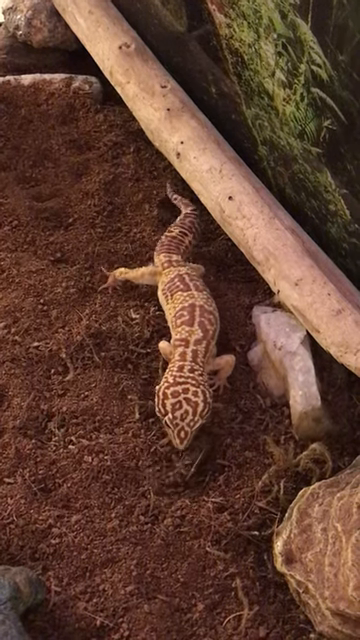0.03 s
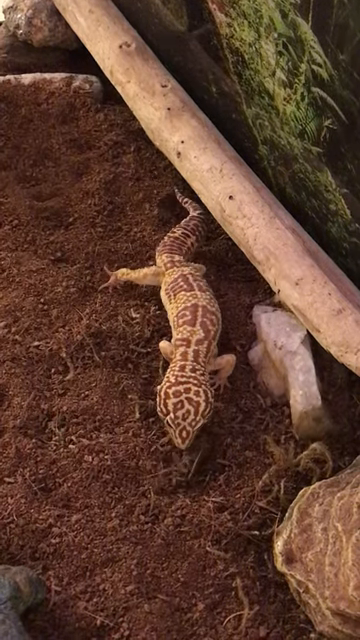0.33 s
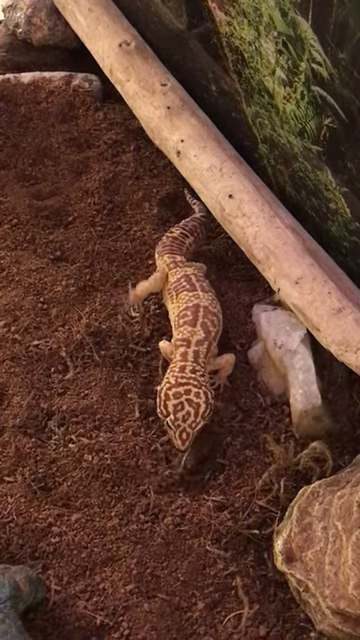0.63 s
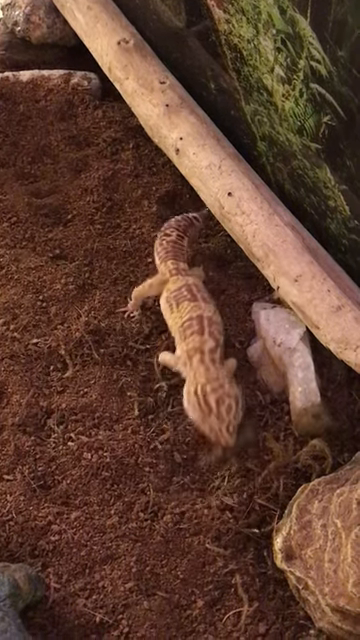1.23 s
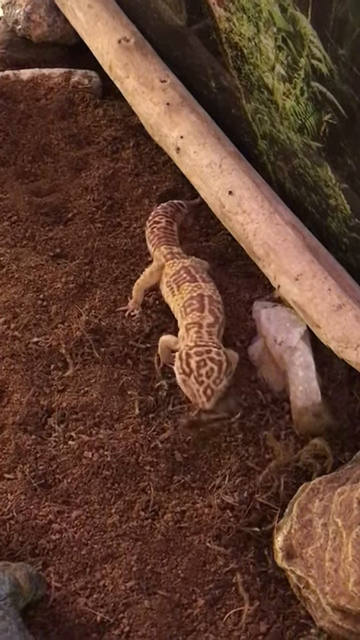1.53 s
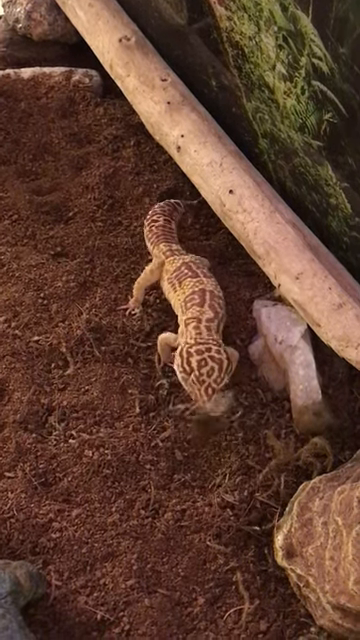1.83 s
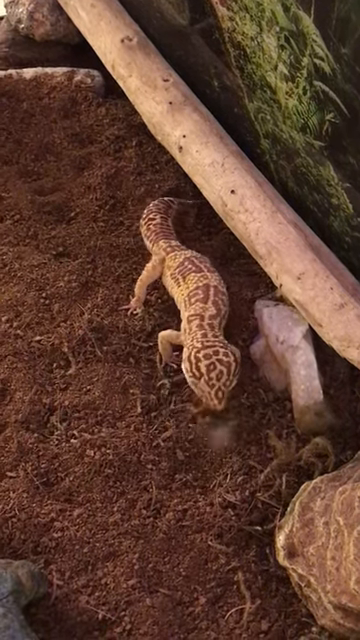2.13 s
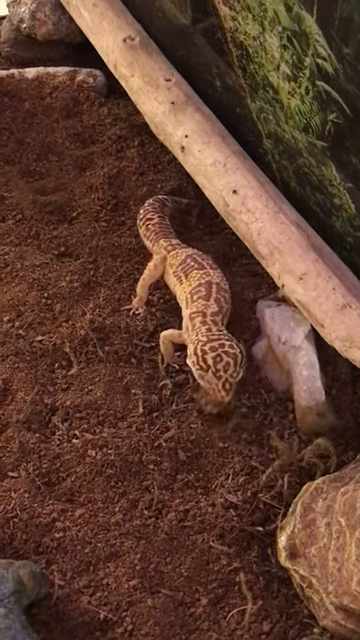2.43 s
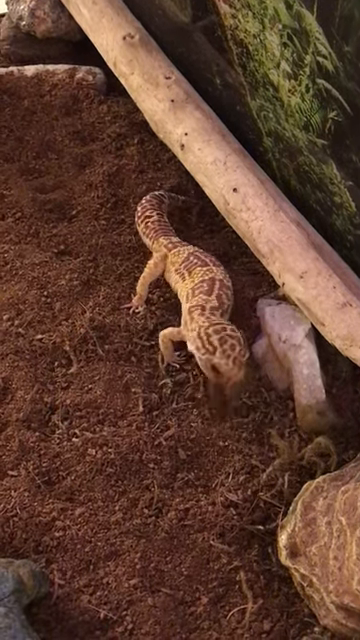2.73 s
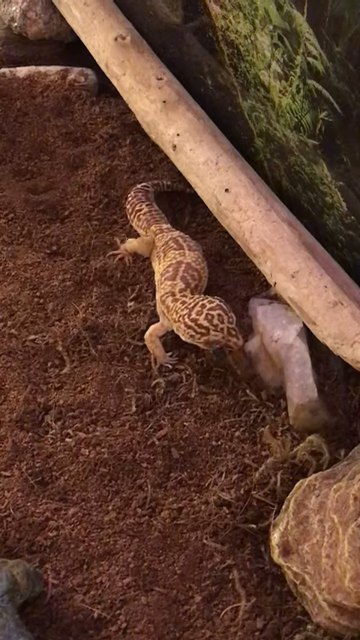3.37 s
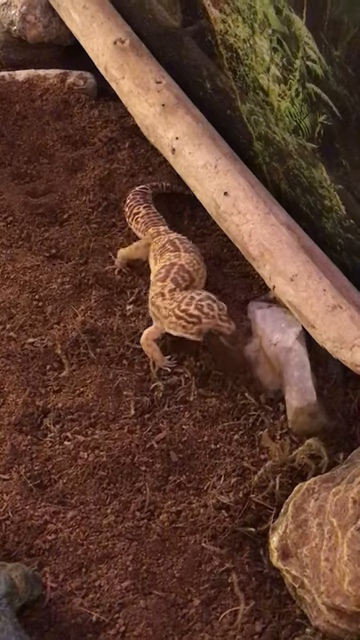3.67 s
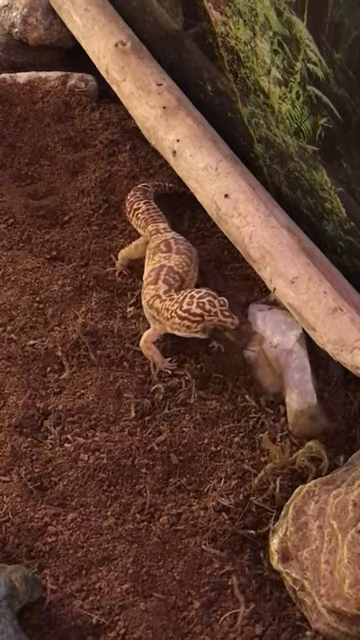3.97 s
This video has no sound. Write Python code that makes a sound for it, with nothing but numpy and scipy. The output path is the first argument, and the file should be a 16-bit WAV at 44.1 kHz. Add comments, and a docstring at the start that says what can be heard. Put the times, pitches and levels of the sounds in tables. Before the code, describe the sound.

A gecko bites an insect with a small, sharp crack at about 0.9 seconds and a thinner snap at 1.2. Dry wings scrape in fits from 1.8 seconds, flutter evenly from 2.2 to 2.7 with a faint thin squeak, then falter by 3. Tiny shell ticks and soft soil rustles are scattered throughout, clustering near 3.6 seconds, over a steady low electrical room hum.

```python
"""A glass tank in a quiet, humming room: a gecko snaps up a large winged insect on loose soil.
The bite cracks the shell once, and a thinner snap follows with the lunge. The insect thrashes,
beats its dry wings about twenty times a second under a thin squeak, then falters.
Feet and bodies rustle in the soil, dotted with small ticks of shell and grit.
Behind it all sits a bed of mains hum, fan whine and soft air."""
import sys
import numpy as np
from scipy import signal
from scipy.fft import rfft, irfft
from scipy.io import wavfile
from scipy.ndimage import uniform_filter1d, map_coordinates

SR = 44100
rng = np.random.default_rng(int(sys.argv[2]) if len(sys.argv) > 2 else 0)


def int16_out(signal):
    """Quantize to a 16-bit WAV file."""
    q = np.round(np.clip(np.atleast_2d(signal).T, -1, 1) * 32767)
    wavfile.write(sys.argv[1], SR, q.astype(np.int16))


N = 176400
T = np.arange(N) / SR

# ring of the cracking shell (frequency [Hz], relative level [dB], t60 [s])
SHELL_MODES = [(2200, -15, 0.0097), (2480, -10, 0.019), (2680, -4, 0.0087), (3150, -6.5, 0.0067),
               (3900, -7.5, 0.0036), (5260, -16, .003), (6100, -14.5, .004), (6500, -17, .004)]
# ring of the piece that breaks in the lunge (frequency [Hz], relative level [dB], t60 [s])
SNAP_MODES = [(2600, -30, 0.0025), (3370, -9, 0.0071), (5840, -5, 0.002), (6460, 0, 0.0027),
              (8350, 0, 0.0029), (11600, -9, .0012), (14300, -3, .0015)]
# ticks of shell and grit (time [s], dry peak level [dB], centre [Hz])
TICK_CUES = [(.091, -55, 11000), (.501, -50, 8900), (0.941, -49, 910), (0.985, -41, 12100),
             (1.046, -52, 11000), (1.059, -50, 10000), (1.166, -48, 6470), (1.2047, -53, 11300),
             (1.549, -45, 11000), (1.587, -43, 11000), (1.625, -52, 12000), (2.1115, -48, 10500),
             (2.1605, -40, 9500), (2.1795, -42.5, 6000), (2.287, -45, 12500), (2.524, -55, 9500),
             (2.7095, -45, 13500), (2.78, -43, 8950), (2.892, -48, 11000), (2.9235, -42.5, 8500),
             (3.228, -49, 1520), (3.330, -54, 12000), (3.3395, -51.5, 4960), (3.3395, -61, 12000),
             (3.380, -55, 12000), (3.390, -53, 9000), (3.481, -52, 11000), (3.613, -47, 10000),
             (3.6255, -45, 11000), (3.644, -47, 11000), (3.654, -48, 5000), (3.663, -43, 13500),
             (3.6878, -42, 13000), (3.6895, -44, 13000), (3.6912, -42, 12500), (3.817, -39.5, 13500)]

# single wing strokes of the struggle (time [s], level [dB], swell [s])
WING_STROKES = [(1.8045, -53.5, 0.0053), (1.819, -60, 0.0036), (1.851, -59.5, .006), (1.874, -60, .002),
                (1.926, -56.5, 0.0044), (1.963, -54, 0.0051), (1.971, -49, 0.0038), (1.980, -60, 0.0071),
                (2.023, -67, 0.0053), (2.053, -57, 0.0048), (2.073, -62, 0.0037), (2.109, -52.5, 0.0033),
                (2.127, -59, .006), (2.158, -62, 0.006), (2.176, -63, 0.0058), (2.217, -61, .004),
                (2.255, -62, .003), (2.305, -66, .003), (2.356, -63, .003), (2.726, -66, 0.005),
                (2.736, -63, 0.006), (2.773, -59, 0.002), (2.778, -56, .003), (2.786, -57, 0.0065),
                (2.828, -58.5, 0.0038), (2.843, -58, 0.0019), (2.875, -59, 0.0038), (2.890, -55, 0.0027),
                (2.923, -59.5, 0.0051), (2.935, -60, 0.0042), (2.968, -57.5, 0.0038), (2.983, -57, 0.0061),
                (3.026, -64, 0.0042), (3.043, -62, 0.0045), (3.064, -61, .003)]
# force of the flutter's downstrokes (time [s], level [dB])
FLUTTER_EFFORT = [(2.24, -55.5), (2.3, -56), (2.44, -57.5), (2.49, -56), (2.59, -57.5), (2.69, -56.5)]
# wings brushing the soil between strokes (time [s], level [dB])
WING_BRUSHING = [(1.98, -82), (2.1, -68.5), (2.35, -81), (2.75, -79), (3.1, -81)]
# dry wing tone, with narrow peaks near 9 and 12 kHz (frequency [Hz], relative level [dB])
WING_EQ = [(1000, -12.5), (3700, -8.5), (4900, -11.5), (6300, -7.5), (7100, -6), (7800, -10), (8600, 4),
           (8950, -6), (9300, 4.5), (9850, -4.5), (10500, -7), (11500, -2), (12000, -5), (12300, 2),
           (12700, -4), (14000, -6), (16000, -6)]
# swell of air stirred by the wings (time [s], level [dB])
DRAUGHT_FADE = [(1.8, -85), (2.3, -70), (2.7, -66), (3.0, -73), (3.4, -82), (3.9, -93)]
# tone of that stirred air (frequency [Hz], relative level [dB])
DRAUGHT_EQ = [(150, 9), (350, -12), (550, 7.5), (850, -8), (1200, 6), (1700, -16), (4000, -14.5),
              (6000, -25)]
# thin squeak during the flutter (time [s], pitch [Hz], level [dB])
SQUEAK_CONTOUR = [(2.38, 2453, -84), (2.45, 2480, -74), (2.49, 2390, -82), (2.514, 2490, -69),
                  (2.54, 2490, -74), (2.565, 2525, -67), (2.605, 2500, -82), (2.63, 2480, -76),
                  (2.682, 2525, -67), (2.71, 2420, -79), (2.78, 2280, -82)]

# shuffles in the soil (time [s], length [s], start level [dB], end level [dB])
SOIL_SHUFFLES = [(0.078, 0.63, -75.5, -82.5), (0.612, 0.43, -79.5, -67.5), (1.042, 0.022, -66, -58),
                 (1.063, 0.12, -61, -72.5), (1.18, 0.19, -73, -79), (1.547, 0.057, -69, -66),
                 (1.616, .11, -75, -69.5), (1.785, 0.27, -80, -71), (2.054, 1.0, -69, -71),
                 (3.053, 0.113, -75, -76), (3.22, 0.055, -75, -76), (3.28, 0.03, -69, -67),
                 (3.578, 0.02, -74, -61.5), (3.599, 0.079, -66, -73.5)]
# tone of loose soil (frequency [Hz], relative level [dB])
SOIL_EQ = [(1000, 5), (3500, -7), (5000, -4.5), (6200, 0), (7400, -2.5), (8700, 3), (10400, -3),
           (11600, 3.5), (14500, 0), (16000, -12)]
# soft pats on the soil (time [s], level [dB], centre [Hz])
SOIL_PATS = [(2.345, -72, 402), (3.217, -59, 292), (3.342, -61, 262), (3.785, -71, 650)]
# claws and legs scratching the soil, duller than the wings (time [s], level [dB], swell [s])
CLAW_SCRATCHES = [(1.164, -67, 0.0044), (1.9725, -56.5, 0.0038), (2.054, -64, .005), (2.177, -58, 0.0056),
                  (2.729, -66, 0.011), (2.776, -68, 0.011), (3.592, -72, 0.014)]

# mains hum and a small motor (frequency [Hz], level [dB])
HUM_TONES = [(120, -46), (107.4, -63.5), (113.8, -74), (132.4, -75), (138.6, -71), (141.7, -74),
             (144.8, -70), (240, -80), (752, -84), (1054, -86), (1397, -85)]
# fan whine: its fundamental, then its partials (harmonic [number], level [dB])
FAN_HZ, FAN_PARTIALS = 214.8, [(1, -70), (2, -81.5), (3, -78.5)]
# tone of the room air (frequency [Hz], relative level [dB])
AIR_EQ = [(22, -29), (31, -4), (70, 3), (130, 4.5), (190, -4), (300, -4), (500, -9), (640, -6), (850, -9.5),
          (1250, -8.5), (1600, -13), (2500, -14), (3000, -18), (4200, -19), (4900, -25), (5600, -22.5),
          (7600, -28), (9200, -26.5), (10400, -30.5), (11600, -26.5), (16000, -28.5)]


def bite(bite_s=.942, snap_s=1.2198):
    """The jaws crack the shell, which rings for milliseconds; a thinner snap comes with the lunge."""
    bandpass = signal.butter(5, (1800, 7000), "band", fs=SR, output="sos")
    crack = signal.sosfilt(bandpass, ring(bite_s, SHELL_MODES))
    return amp(-33) * crack + amp(-44) * ring(snap_s, SNAP_MODES)


def ticks(decay_s=.00025):
    """Sharp little fractures, each with its own brightness: one clean break and a brief rattle."""
    out, size = np.zeros(N), 1024
    age = (np.arange(size) - size // 2) / SR
    click = age == 0
    for time, db, hz in TICK_CUES:
        rattle = rng.standard_normal(size) * (age > 0) * np.exp(-abs(age) / decay_s)
        burst = band(click + .4 * rattle, hz, octaves=.72)
        first = int(time * SR) - size // 2
        out[first:first + size] += amp(db) * burst / abs(burst).max()
    return out


def wings(flutter_s=2.2368, beat_s=.0507, beats=10, swell_s=.0032):
    """Dry wings scrape in fits, break into an even flutter that stirs the air, then falter."""
    power = sum(stroke(*cue) ** 2 for cue in WING_STROKES)
    for start in flutter_s + beat_s * np.arange(beats):
        db = np.interp(start, *np.array(FLUTTER_EFFORT).T)
        downstroke = stroke(start, db, swell_s)
        weak_return = stroke(start + .65 * beat_s, db - 5, swell_s)
        power += downstroke ** 2 + weak_return ** 2
    envelope = np.sqrt(power + fade(WING_BRUSHING) ** 2)
    texture = colour(crackle(rough_db=3.5, grain_hz=5000), WING_EQ)
    scrape = envelope * shimmer(flex(texture))
    draught = fade(DRAUGHT_FADE) * colour(rng.standard_normal(N), DRAUGHT_EQ)
    return scrape + draught


def flex(x, bend=.025, rate_hz=60):
    """Flexing wings bend all their resonances up and down a little."""
    playhead = np.arange(N) + np.cumsum(bend * walk(rate_hz))
    return map_coordinates(x, [playhead], order=5, mode="mirror")


def squeak(jitter=.022, rough_db=2):
    """A rough, thin tone that rises as it swells and sags as it fades."""
    times, hz, db = np.array(SQUEAK_CONTOUR).T
    pitch = np.interp(T, times, hz) * (1 + jitter * walk(600))
    tone = np.sin(2 * np.pi * np.cumsum(pitch) / SR) * amp(rough_db * walk(200))
    return fade(list(zip(times, db))) * unit(tone)


def soil(rough_db=4.5, edge_s=.0034, resting_per_s=20, stirred_per_s=110):
    """Crumbs shift as the two animals shuffle, pat and scratch; lone grains settle throughout."""
    effort = sum(fade([(start, start_db), (start + length, end_db)])
                 for start, length, start_db, end_db in SOIL_SHUFFLES)
    crumbs = shimmer(colour(crackle(rough_db, grain_hz=3000), SOIL_EQ))
    rustle = uniform_filter1d(effort, int(edge_s * SR)) * crumbs
    grains_per_s = resting_per_s + stirred_per_s * effort / effort.max()
    grains = (rng.random(N) < grains_per_s / SR) * rng.random(N) * amp(-45)
    grit = band(grains, hz=15000, octaves=.7)
    pats = sum(stroke(start, db, swell_s=.0083) * unit(band(rng.standard_normal(N), hz, octaves=.33))
               for start, db, hz in SOIL_PATS)
    claw_texture = unit(band(crackle(rough_db, grain_hz=3700), hz=6570, octaves=.32))
    scratches = sum(stroke(*cue) for cue in CLAW_SCRATCHES) * claw_texture
    return rustle + pats + scratches + tank(grit)


def tank(x, delay_s=.00177, decay_s=.0022, wet_db=-6.5):
    """The glass walls add a tight scatter of echoes to the dry sound."""
    age = T[:1024] - delay_s
    echoes = rng.standard_normal(len(age)) * (age > 0) * np.exp(-abs(age) / decay_s)
    return x + amp(wet_db) * signal.fftconvolve(x, echoes / np.linalg.norm(echoes))[:N]


def room(fan_waver=.00293, fan_flicker_db=2, air_db=-62):
    """The background bed: mains and motor hum, a wavering fan and softly drifting air."""
    hum = sum(amp(db) * np.sin(2 * np.pi * (hz * T + rng.random())) for hz, db in HUM_TONES)
    fan_cycles = np.cumsum(FAN_HZ * (1 + fan_waver * walk(12))) / SR
    fan = sum(amp(db + fan_flicker_db * walk(9)) * np.sin(2 * np.pi * harmonic * fan_cycles)
              for harmonic, db in FAN_PARTIALS)
    air = amp(air_db + .5 * walk(6.8)) * colour(rng.standard_normal(N), AIR_EQ)
    return np.sqrt(2) * (hum + fan) + air  # sqrt(2) makes the tone levels rms


def ring(start, modes):
    """Modes struck together and dying away."""
    age = np.maximum(T - start, 0)
    return sum(amp(db - 60 * np.minimum(age / t60, 3)) * np.sin(2 * np.pi * hz * age)
               for hz, db, t60 in modes)


def stroke(start, db, swell_s):
    """Envelope of one brief contact: a rounded swell and a slightly slower fade."""
    progress = np.clip((T - start) / swell_s, 0, 50)
    return amp(db) * (progress * np.exp(1 - progress)) ** 2


def crackle(rough_db, grain_hz):
    """Dense tiny contacts of uneven strength."""
    return rng.standard_normal(N) * amp(rough_db * walk(grain_hz))


def shimmer(x, depth_db=1.5, rate_hz=70):
    """A scrape changes colour from contact to contact: six bands rise and fall independently."""
    log_hz = np.log(np.maximum(np.fft.rfftfreq(N, 1 / SR), 1))
    centres = np.log(np.geomspace(4500, 15000, num=6))
    spectrum = rfft(x)
    bands = [irfft(spectrum * np.interp(log_hz, centres, solo), N) for solo in np.eye(len(centres))]
    return unit(sum(part * amp(depth_db * walk(rate_hz)) for part in bands))


def colour(x, points):
    """EQ through (frequency [Hz], relative level [dB]) points, scaled to rms 1."""
    hz, db = np.array(points).T
    freqs = np.maximum(np.fft.rfftfreq(N, 1 / SR), 1)
    gain = amp(np.interp(np.log(freqs), np.log(hz), db))
    return unit(irfft(rfft(x) * gain, N))


def band(x, hz, octaves):
    """A bell-shaped band-pass around one frequency."""
    freqs = np.maximum(np.fft.rfftfreq(len(x), 1 / SR), 1)
    bell = np.exp(-.5 * (np.log2(freqs / hz) / octaves) ** 2)
    return irfft(rfft(x) * bell, len(x))


def fade(points):
    """A fader ride through (time [s], level [dB]) points, silent outside them."""
    times, db = np.array(points).T
    return amp(np.interp(T, times, db, left=-np.inf, right=-np.inf))


def walk(rate_hz):
    """Smooth random modulation at rms 1."""
    hold = max(int(SR / rate_hz), 2)
    steps = np.repeat(rng.standard_normal(N // hold + 1), hold)[:N]
    return unit(uniform_filter1d(steps, hold))


def amp(db):
    """Decibels to gain."""
    return 10 ** (np.asarray(db) / 20)


def unit(x):
    """Scale to rms 1."""
    return x / np.sqrt(np.mean(x ** 2))


def scene():
    """The struggle in the tank over the room bed, mixed to mono."""
    return (tank(bite() + ticks()) + wings() + squeak() + soil() + room())[None]


def record(dry, top_hz=16000):
    """A steep low-pass trims the very top of the mix."""
    return signal.sosfilt(signal.ellip(10, .2, 70, top_hz, fs=SR, output="sos"), dry)


dry = scene()
out = record(dry)
int16_out(out)
```